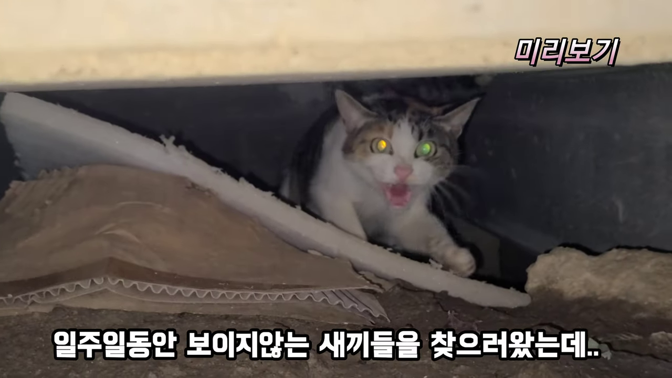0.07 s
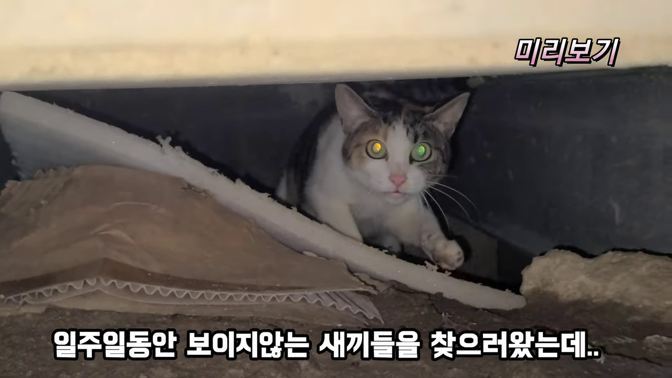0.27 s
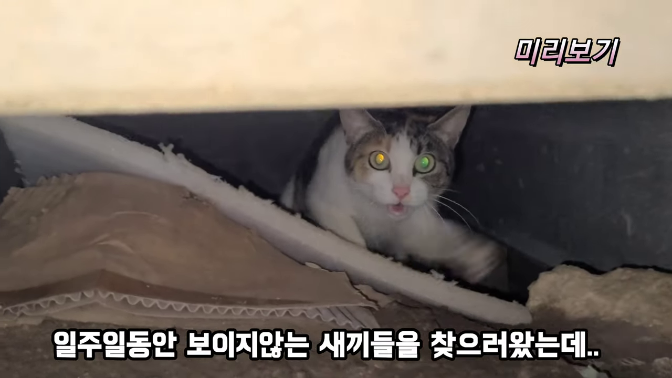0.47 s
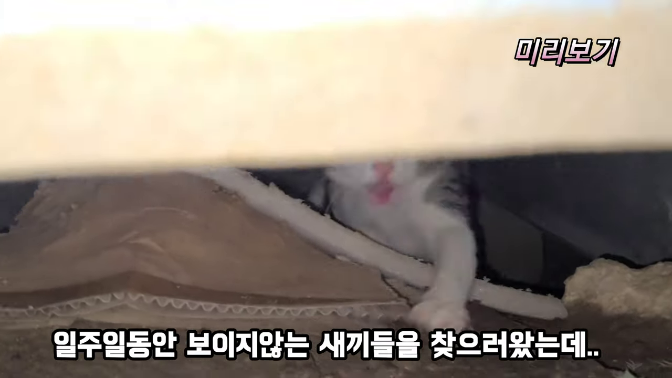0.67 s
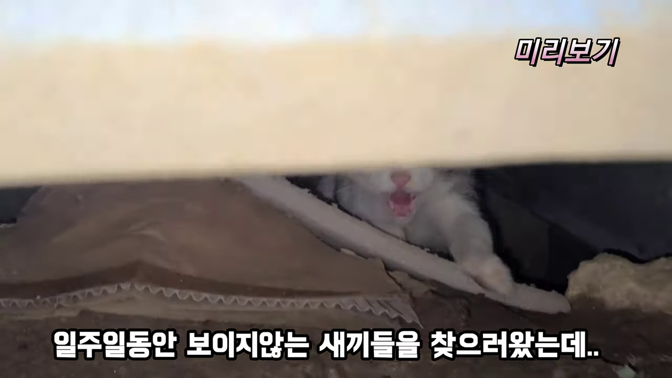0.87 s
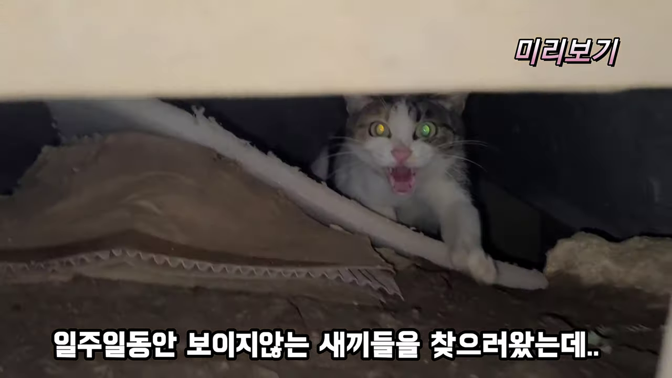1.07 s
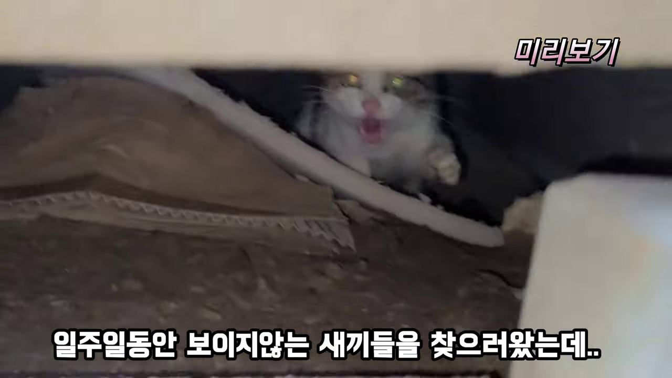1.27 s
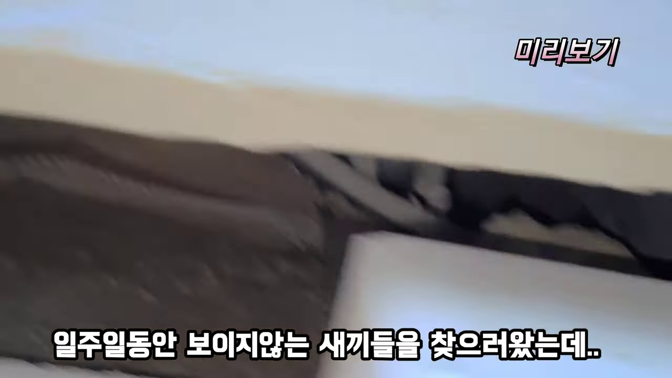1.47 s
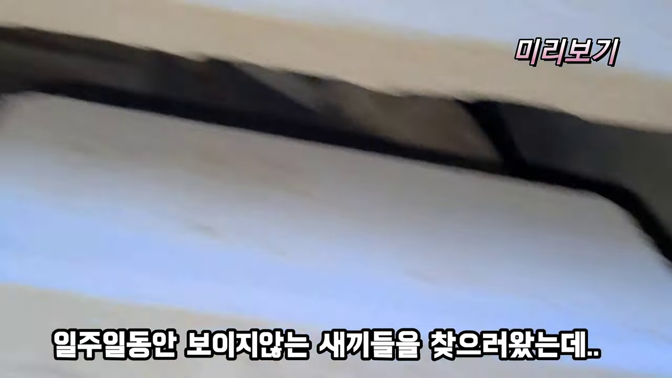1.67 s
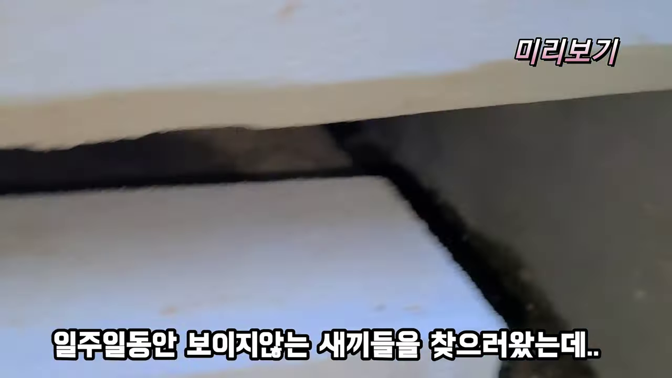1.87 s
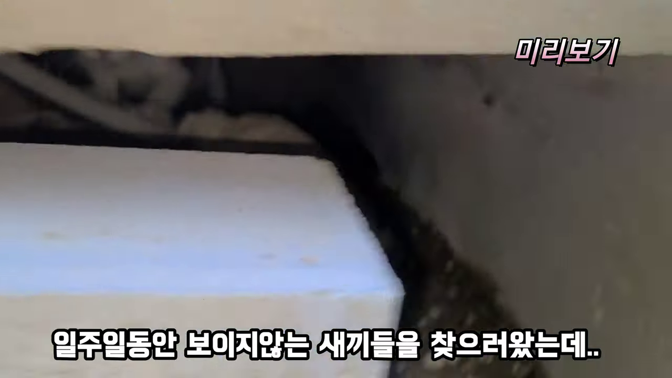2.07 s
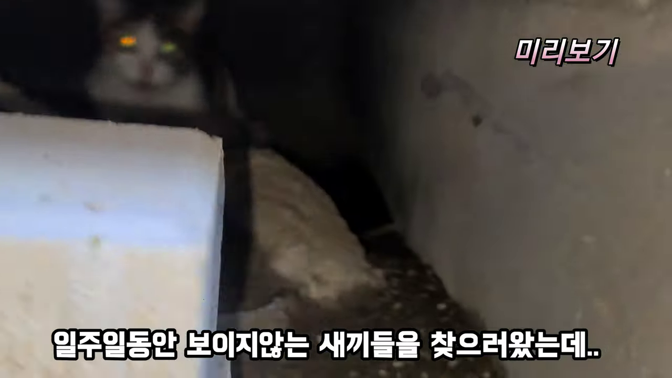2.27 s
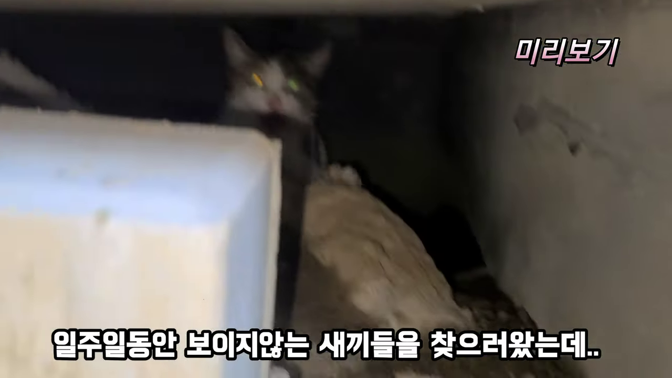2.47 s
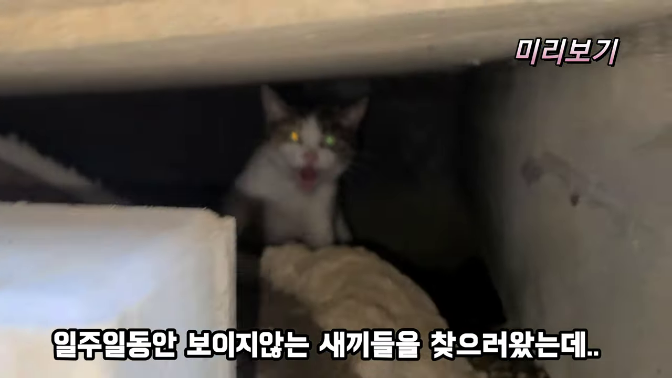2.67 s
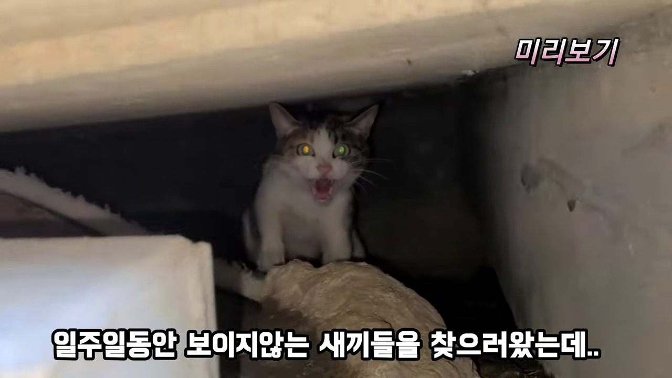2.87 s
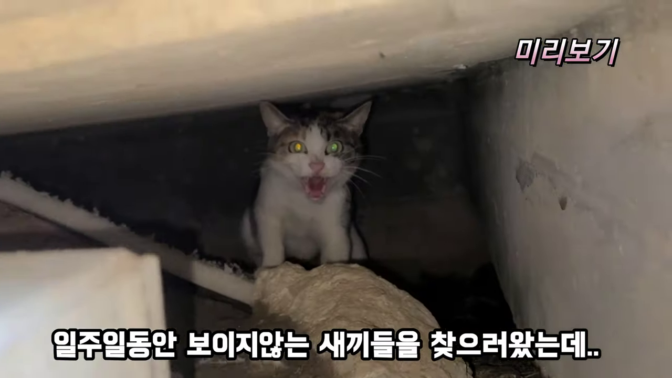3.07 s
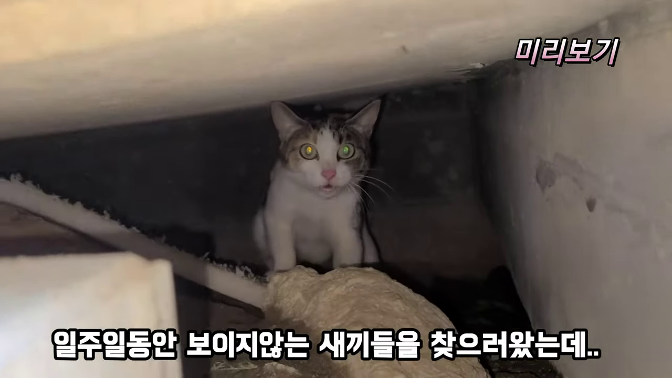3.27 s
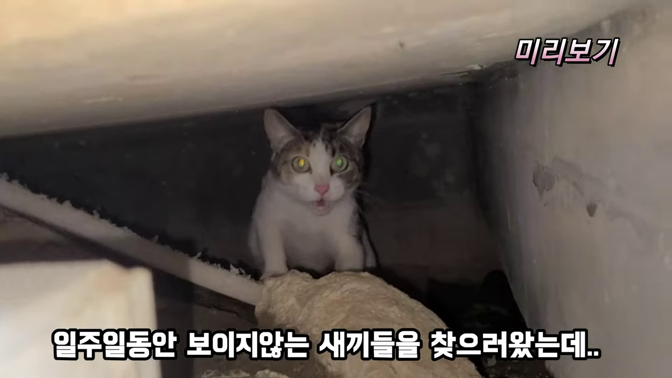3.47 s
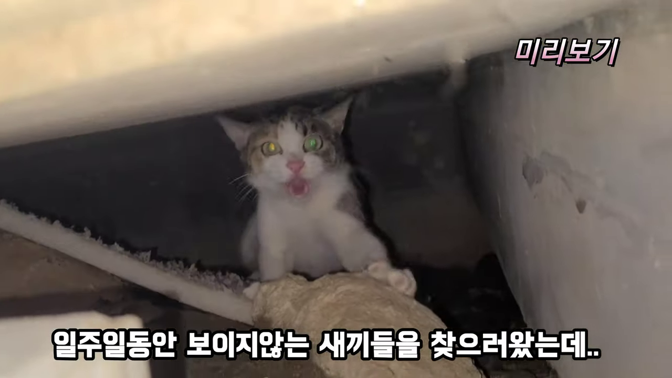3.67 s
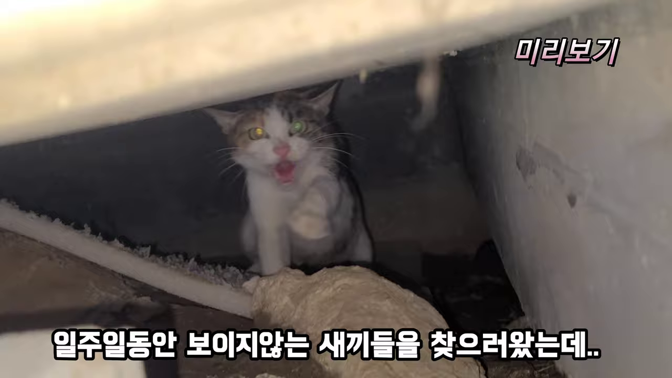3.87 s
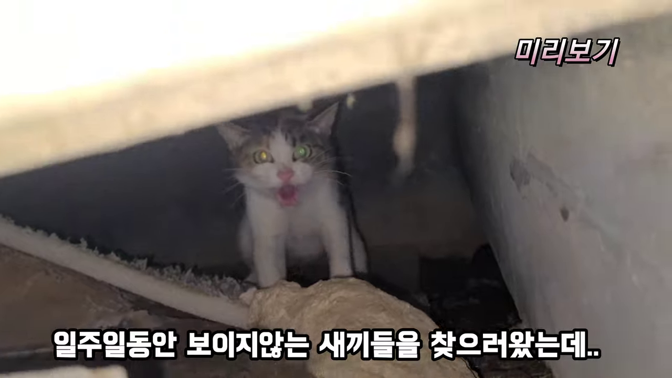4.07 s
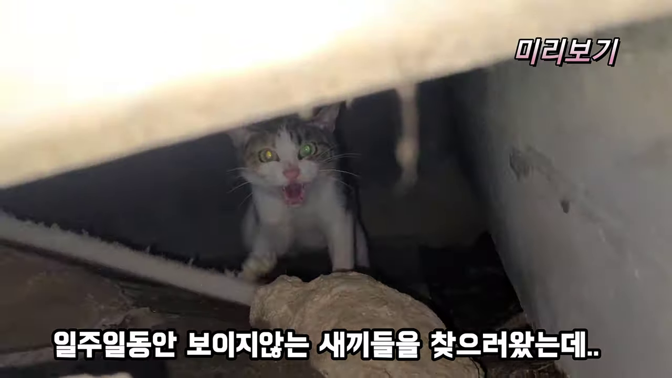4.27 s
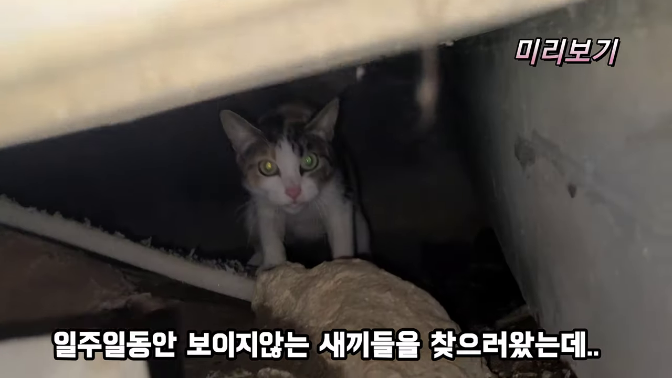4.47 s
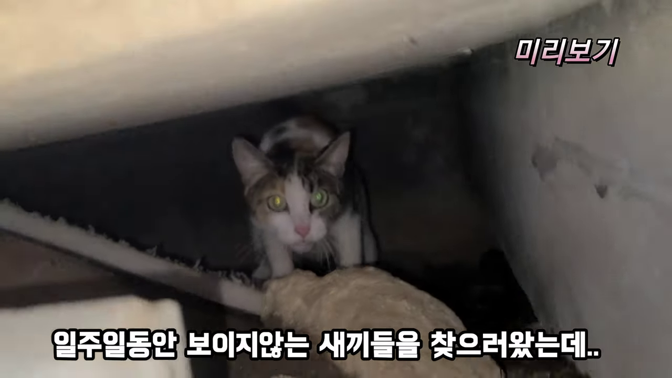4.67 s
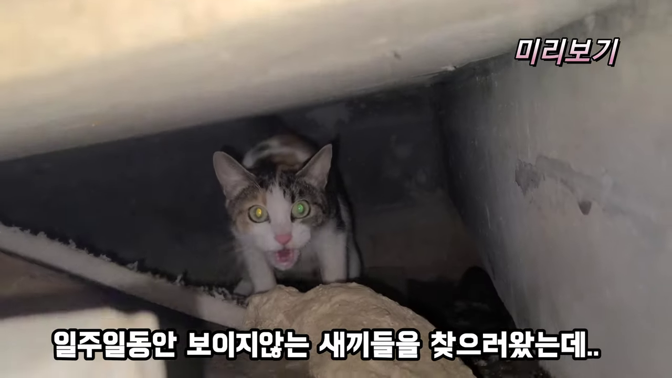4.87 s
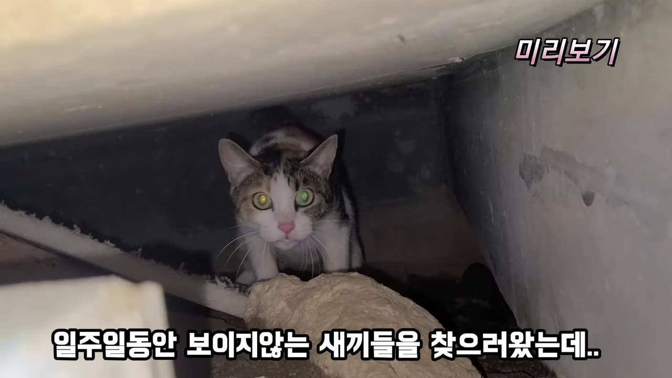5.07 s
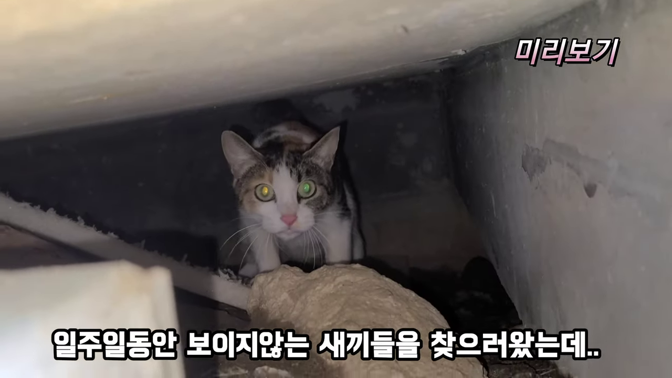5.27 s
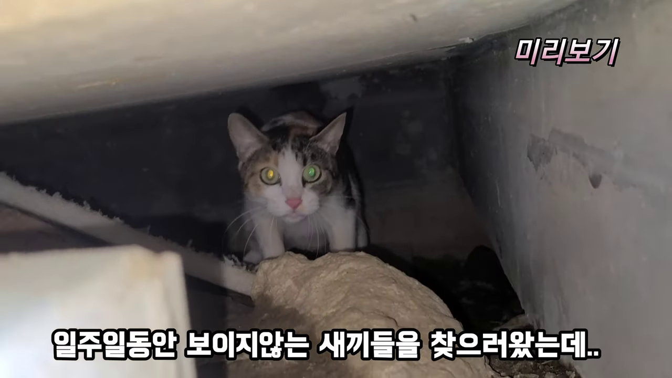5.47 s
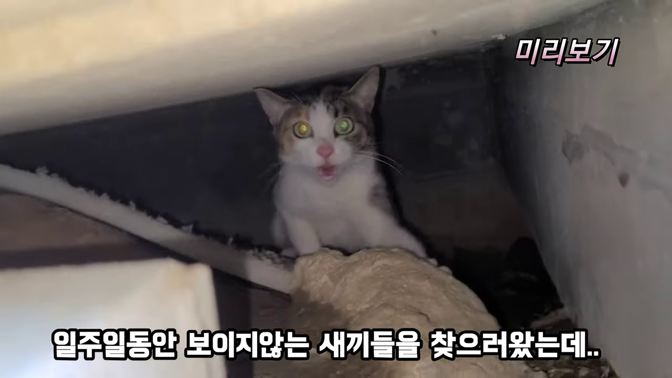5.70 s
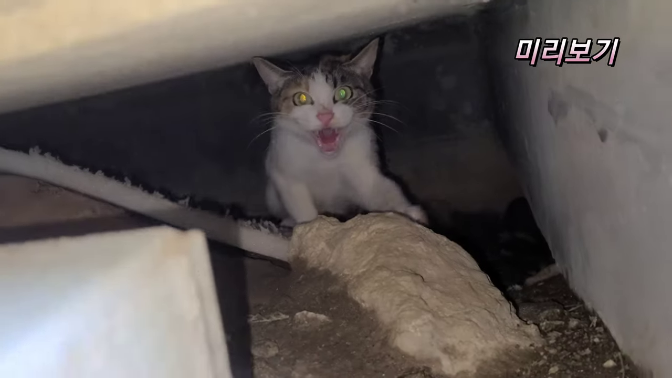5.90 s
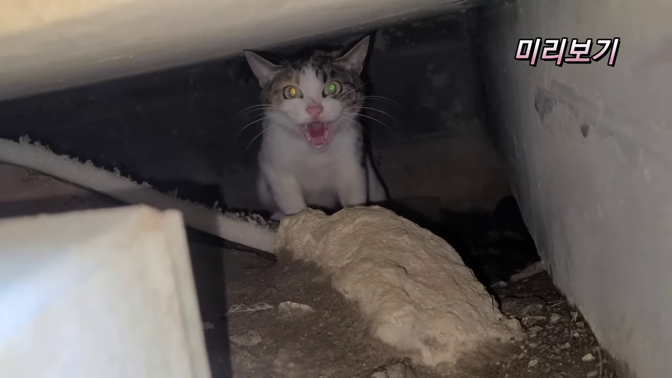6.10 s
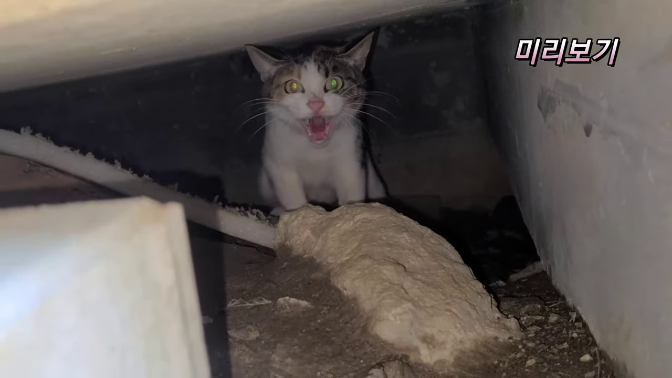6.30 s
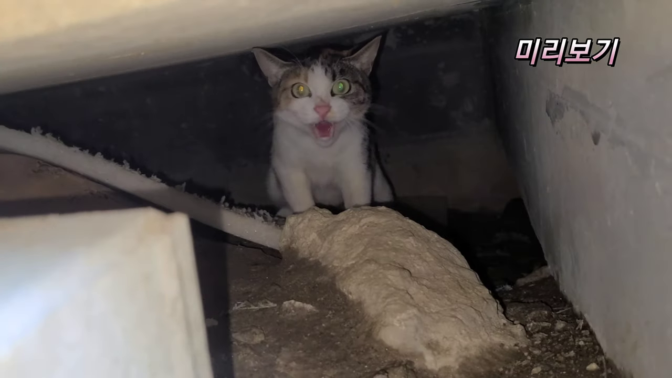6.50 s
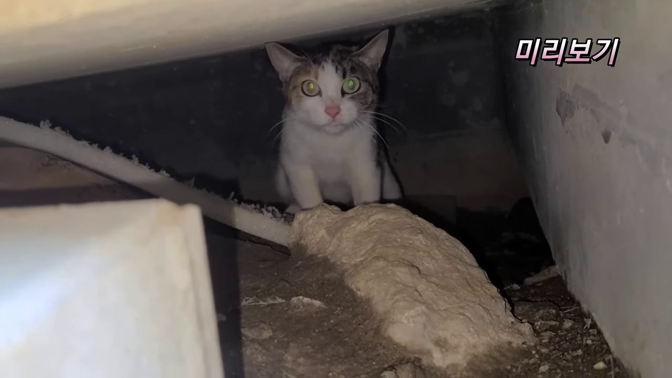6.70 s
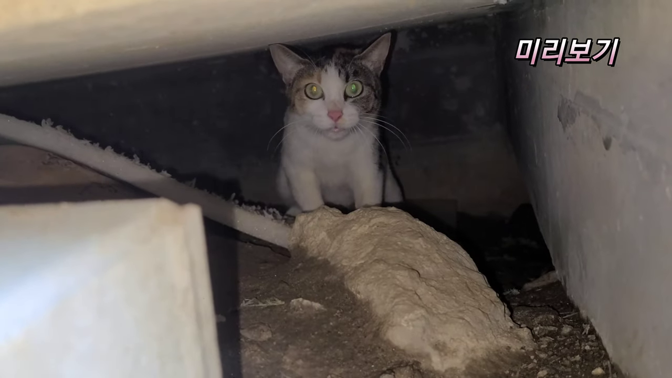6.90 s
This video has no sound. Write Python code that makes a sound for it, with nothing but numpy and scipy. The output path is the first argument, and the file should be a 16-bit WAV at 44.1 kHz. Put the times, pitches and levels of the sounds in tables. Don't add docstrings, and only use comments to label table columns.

```python
import sys
import numpy as np
from scipy import signal
from scipy.fft import rfft, irfft, next_fast_len
from scipy.io import wavfile

SR = 44100
rng = np.random.default_rng(int(sys.argv[2]) if len(sys.argv) > 2 else 0)


def log_audio(samples):
    frames = np.atleast_2d(samples).T
    limited = np.clip(frames, -1, 1)
    pcm = np.round(limited * 32767).astype(np.int16)
    wavfile.write(sys.argv[1], SR, pcm)


def ratio(d):
    e = np.asarray(d, float) / 20
    return 10 ** e


N = 306054
TIME = np.arange(N) / SR


def rms_one(x):
    return x / np.sqrt(np.mean(x ** 2, axis=-1, keepdims=True) + 1e-20)


def in_time(rows):
    s, *columns = np.transpose(rows)
    return [np.interp(TIME, s, column) for column in columns]


def at_hz(points, hz, order=1):
    points = np.array(points)
    return np.interp(np.log(hz + 1), np.log(points[:, 0]), points[:, order])


def coloured(x, points):
    size = next_fast_len(N)
    gain = ratio(at_hz(points, np.fft.rfftfreq(size, 1 / SR)))
    return rms_one(irfft(rfft(x, size) * gain, size)[..., :N])


def drift(rate, channels=2):
    r = np.exp(-40 * np.pi * rate / SR)
    noise = rng.standard_normal((channels, N // 20 + 4002))
    slow = rms_one(signal.lfilter([1], [1, -2 * r, r * r], noise)[:, 4000:])
    return np.array([np.interp(np.arange(N) / 20, np.arange(len(s)), s) for s in slow])


def resonate(x, modes):
    out = 0
    for k, (hz, width, db) in enumerate(modes):
        r = np.exp(-np.pi * width / SR)
        poles = [1, -2 * r * np.cos(2 * np.pi * hz / SR), r * r]
        gain = (-1) ** k * ratio(db) * (1 - r * r) / 2
        out = out + gain * signal.lfilter([1, 0, -1], poles, x)
    return out


def panned(pair, pan_db, alike):
    alike = np.clip(alike, 0, 1)
    left, right = ratio(pan_db / 2), ratio(-pan_db / 2)
    mean = np.sqrt(left ** 2 + right ** 2 + 2 * alike * left * right) / 2
    blend = alike * pair[1] + np.sqrt(1 - alike ** 2) * pair[0]
    return np.array([left * blend, right * pair[1]]) / mean


def grains(per_s, spread_db):
    sizes = ratio(spread_db * np.minimum(rng.exponential(1, N), 4)) * (rng.random(N) < per_s / SR)
    fading = signal.lfilter([1], [1, -np.exp(-1 / (0.0032 * SR))], sizes)
    return rng.standard_normal((2, N)) * (1 + fading)


def rubbing(level_db, pan_db, colour, per_s, spread_db, patchy_db, alike):
    clumps = ratio(patchy_db * (drift(49.0, channels=1) + 0.56 * drift(130)))
    friction = rms_one(clumps * coloured(grains(per_s, spread_db), colour))
    return ratio(level_db) * panned(friction, pan_db, alike)


def strokes(rows, rise_s, fall_s, ease=0):
    s, length = np.transpose(rows)[:2, :, None]
    t = TIME[::32] - s
    before = np.maximum(-t, 0) / (rise_s + ease * length)
    after = np.maximum(t - length, 0) / (fall_s + ease * length)
    return ratio(-20 * (before + after))


def stroke_level(shape, db, rest_db):
    power = (shape * ratio(db)[:, None]) ** 2
    total = power.sum(axis=0) + ratio(rest_db) ** 2
    return np.interp(TIME, TIME[::32], 10 * np.log10(total))


def stroke_side(shape, db, rest_db, pan_db):
    power = (shape * ratio(db)[:, None]) ** 2
    total = power.sum(axis=0) + ratio(rest_db) ** 2
    return np.interp(TIME, TIME[::32], pan_db @ power / total)


def contacts(table, t60, rise, sharpness, overtone_db, snap, skirt=0.99, order=1):
    out, t = np.zeros((2, N + 4000)), np.arange(4000) / SR
    decay = ratio(-60 * np.maximum(t - rise, 0) / t60)
    fade = np.minimum(t / rise, 1) * np.linspace(1, 0, 4000) ** .5 * decay
    bright = signal.butter(1, [2500, 10000], "band", fs=SR)
    noises = rng.standard_normal((len(table), 2, 4000))
    for (s, db, hz, crack_db, pan_db), noise in zip(table, noises):
        force = noise * fade + snap * (t == 0)
        ring = (hz, hz / sharpness, 0)
        overtone = (3600, 2000 / sharpness, overtone_db)
        thud = (0.49 * hz, 0.16 * hz, overtone_db + 1.0)
        body = 0
        for mode in (ring, overtone, thud):
            dull = signal.butter(2, skirt * mode[0], fs=SR)
            body = body + signal.lfilter(*dull, resonate(force, [mode]))
        for _ in range(order - 1):
            body = resonate(body, [(hz, hz / 2, 0)])
        crack = ratio(crack_db - 8.5) * signal.lfilter(*bright, force * fade)
        at = round(s * SR)
        hit = ratio(db) * body / np.abs(body).max() + crack
        out[:, at:at + 4000] += panned(hit, pan_db, alike=0.035)
    return out[:, :N]


def breaths(rows, opens_s, arch_db):
    s, length, db, closing = np.transpose(rows)[:4, :, None]
    t = np.clip(TIME - s, 0, length)
    mouth = np.minimum(t / opens_s, 1) ** 0.73 * np.minimum((length - t) / closing, 1) ** 1.4
    return ratio(db - arch_db * (2 * t / length - 1) ** 2) * mouth


def hisses():
    # (start t/s, length t/s, throat air level/dB, closing t/s, broad air of a wide mouth level/dB)
    hiss_rows = [
        (-.4, 0.64, -32.5, 0.053, -9.5),
        (1.022, 0.6, -36, 0.11, -10.5),
        (2.633, 0.677, -41, 0.065, 2.5),
        (3.919, 0.593, -35.5, 0.02, -3),
        (5.99, 0.69, -37.5, 0.16, -4),
    ]
    # (f/Hz, width f/Hz, level/dB)
    throat_modes = [(370, 22, 1), (485, 36, -8), (900, 60, -2), (1170, 60, -8), (1460, 80, -15),
                    (2190, 70, -17), (2800, 110, -21), (3730, 60, -19), (5350, 200, -25)]
    # level/dB of the (third, fourth, fifth, sixth, upper) resonances
    mouth_shapes = [(-3, -4, 1, -17, -13.5), (-1, -1, 1.5, -8, -5), (-0.5, -0.5, 0.5, -11, -2),
                    (-2.5, -4, -5, 0.5, -1), (0, -21, -9, -18, -14)]
    flow = breaths(hiss_rows, opens_s=0.17, arch_db=4)
    air = rng.standard_normal((3, 2, N))
    band = signal.butter(4, [330, 1250], "band", fs=SR, output="sos")
    broad = rms_one(signal.sosfilt(band, air[0]))
    groups = [throat_modes[:2], *(throat_modes[k:k + 1] for k in range(2, 6)), throat_modes[6:]]
    rings = [(-1) ** max(k - 1, 0) * resonate(air[1], group) for k, group in enumerate(groups)]
    gains = [flow.sum(axis=0), *(ratio(np.transpose(mouth_shapes)) @ flow)]
    throat = sum(gain * ring for gain, ring in zip(gains, rings)) / np.std(sum(rings))
    wide = ratio(np.array(hiss_rows)[:, 4]) @ flow * broad
    flutter = ratio(1.28 * drift(45, channels=1) + 1.26)
    return flutter * (throat + wide) + jets(air[2])


def jets(air):
    # (start t/s, length t/s, level/dB, closing t/s, resonance widening [times])
    jet_rows = [
        (-.3, 0.57, -50, 0.038, 0.58),
        (1.12, 0.59, -77, .07, 2.7),
        (2.815, 0.49, -32.5, 0.059, 1.16),
        (4.0, 0.42, -76, .035, 1.1),
        (6.051, 0.56, -41.5, 0.057, 1.2),
    ]
    # (f/Hz, width f/Hz, level/dB)
    teeth_modes = [(2030, 160, -1), (3000, 300, 0), (3800, 300, -5), (5150, 500, -1), (7250, 450, 4),
                   (9300, 700, -5), (10500, 500, -3), (12600, 900, -7), (14200, 1000, -5)]
    out = np.zeros((2, N))
    for row, gain in zip(jet_rows, breaths(jet_rows, opens_s=0.064, arch_db=7)):
        on = gain > 0
        blurred = [(hz, width * row[4], db) for hz, width, db in teeth_modes]
        out[:, on] += gain[on] * rms_one(resonate(air[:, on], blurred))
    return out * ratio(0.3 * drift(35, channels=1) - 7.5)


def rubs():
    # (start t/s, length t/s, body level/dB, sheen level/dB, left-right level/dB)
    rub_rows = [(0.0, 0.12, -49.5, -53.5, -4), (0.317, 1, -70.5, -58, 44), (0.655, 0.19, -54, -46, 4.5),
                (0.983, 0.0082, -54, -53, 7), (1.174, 0.021, -41, -47.5, 12), (1.238, 0.056, -49, -48, 10),
                (1.354, 0.14, -43, -46, 8), (1.51, 0.26, -48, -49.5, -5), (1.8, 0.07, -47, -43, -6),
                (1.901, .02, -45.5, -49.5, -7), (1.954, 0.034, -68, -56.5, -6),
                (2.03, 0.53, -52, -53.5, -8.5), (2.867, 0.31, -43.5, -46.5, -15),
                (3.508, 0.042, -60, -54, -15), (3.63, 0.012, -49.5, -48.5, -6),
                (3.736, 0.043, -41.5, -42.5, -10), (3.832, 0.043, -48.5, -53, 1),
                (4.08, 0.35, -47.5, -51.5, -10), (4.883, 0.14, -54.5, -57.5, 7),
                (5.423, 0.11, -47, -42.5, 5), (5.555, 0.13, -45.5, -50, 5.5),
                (5.761, 0.022, -30.5, -45, -2), (5.807, 0.066, -39.5, -49.5, 12),
                (5.94, 0.13, -53, -59.5, 13), (6.117, 0.25, -45, -50, 21), (6.428, 0.12, -53, -66, 25),
                (6.926, 0.023, -44, -59, 32)]
    # (f/Hz, level per Hz/dB)
    body_colour = [(760, 8), (1300, 11.5), (1620, 4), (3320, 5.5), (5000, 5), (7000, -22), (15400, -82)]
    # (f/Hz, level per Hz/dB)
    sheen_colour = [(3820, -2.5), (6500, -5.5), (6900, -12.5), (9230, 0), (15100, -14.5), (16000, -8)]
    rest_db = -64.5
    shape = strokes(rub_rows, rise_s=0.064, fall_s=0.018, ease=0.43)
    body_db, sheen_db, pan_db = np.transpose(rub_rows)[2:]
    side = stroke_side(shape, body_db, rest_db, pan_db)
    body_level = stroke_level(shape, body_db, rest_db) - 9.0
    sheen_level = stroke_level(shape, sheen_db, rest_db - 18) - 9.5
    body = rubbing(body_level, side, body_colour, per_s=98, spread_db=-2.5, patchy_db=1.1, alike=.1)
    sheen = rubbing(sheen_level, side - 6, sheen_colour, per_s=14, spread_db=1.0, patchy_db=0.9, alike=.1)
    return focused(body) + sheen


def focused(x, size=256):
    # (t/s, f/Hz)
    pitch = [(.1, 3400), (.65, 2550), (1.18, 3180), (1.27, 2920), (1.38, 3720), (1.53, 2840), (1.8, 2220),
             (4.6, 2250), (4.98, 2560), (5.4, 3070), (5.62, 3400), (5.66, 2410), (5.72, 2200), (5.86, 2600),
             (5.95, 3250), (6.4, 3400)]
    width_hz, sing_db = 700, 7
    out, state = x.copy(), np.zeros((2, 2))
    r, (hz,) = np.exp(-np.pi * width_hz / SR), in_time(pitch)
    for i in range(0, N, size):
        poles = [1, -2 * r * np.cos(2 * np.pi * hz[i] / SR), r * r]
        peak, state = signal.lfilter([1, 0, -1], poles, x[:, i:i + size], zi=state)
        out[:, i:i + size] += ratio(sing_db) * (1 - r * r) / 2 * peak
    return out


def hand_rumble():
    # (t/s, level/dB)
    grip = [(0.0, -43), (1.33, -45.5), (1.48, -34.5), (2.76, -32.5), (3.08, -26.5), (3.38, -33.5),
            (3.65, -26), (3.99, -32.5), (4.08, -34.5), (4.68, -37), (4.84, -36.5), (5.07, -44.5),
            (5.5, -41), (5.72, -27.5), (5.93, -34.5), (6.28, -27), (6.45, -35.5), (6.93, -34.5)]
    # (f/Hz, level per Hz/dB)
    rumble_colour = [(15, -7), (32, -10), (49, 5), (162, -10.5), (234, -15), (400, -33.5), (520, -58),
                     (880, -120)]
    level_db, = in_time(grip)
    pan_db = level_db + 44
    lumps = ratio(2.0 * drift(14)) * coloured(rng.standard_normal((2, N)), rumble_colour)
    alike = np.clip(1 - np.abs(pan_db) / 22, .15, .97)
    return ratio(level_db) * panned(rms_one(lumps), pan_db, alike)


def quiet_air():
    # (f/Hz, level per Hz/dB)
    air_colour = [(59, -38), (100, -10.5), (768, -32.5), (1720, -35), (3120, -38), (7610, -57),
                  (9210, -51.5), (16000, -60)]
    noise = coloured(rng.standard_normal((2, N)), air_colour)
    return ratio(-60.0) * panned(noise, 0.67, alike=0.031)


def rasps():
    # (t/s, peak level/dB, ring f/Hz, crack level/dB, left-right level/dB)
    rasp_rows = [(.541, -38.5, 1310, -75, 2), (.56, -38.5, 1460, -75, 0), (.573, -39.5, 1280, -60, 3),
                 (1.372, -32, 3920, -55, 18), (1.394, -33.5, 2910, -60, 13), (1.795, -45, 2100, -58, 0),
                 (1.905, -36.5, 1280, -53, 0), (2.025, -35.5, 900, -65, 7), (2.561, -35.5, 680, -59, -8),
                 (3.477, -45.5, 1500, -65, -11), (3.488, -46, 5140, -60, -16), (3.512, -48, 5060, -40, -14),
                 (3.527, -40, 1000, -65, -3), (3.668, -37, 1220, -43, -10), (3.704, -30, 4840, -37, -15),
                 (3.714, -29, 4670, -25, -17), (3.729, -23, 1160, -49, -7), (3.747, -36, 1180, -32, -22),
                 (4.467, -24.5, 970, -22, -4), (4.475, -30.5, 1430, -31, 2), (2.665, -47, 700, -70, -4),
                 (5.736, -22, 1600, -41, -5), (5.745, -43, 1550, -26, -16), (5.862, -34, 2650, -53, 18),
                 (6.897, -38, 1700, -42, 22), (6.91, -39, 3000, -42, 24), (6.924, -35.5, 1200, -38, 24),
                 (6.215, -35, 3660, -60, 15), (6.74, -42, 1010, -72, 20)]
    return contacts(rasp_rows, t60=.075, rise=.003, sharpness=4.0, overtone_db=-14, snap=0)


def hollow_boom():
    # (start t/s, length t/s, level/dB)
    shifts = [
        (0.574, 0.01, -35),
        (0.785, 0.079, -33),
        (1.468, 0.021, -30),
        (2.51, 0.028, -24),
        (3.495, 0.0084, -32),
        (3.79, 0.031, -20),
        (4.138, 0.32, -35),
        (4.776, 0.13, -33.5),
        (5.64, 0.027, -27.5),
        (5.673, 0.15, -25),
    ]
    boom_hz = 138
    boom = resonate(resonate(rng.standard_normal(N), [(boom_hz, 45, 0)]), [(boom_hz, 90, 0)])
    shape = strokes(shifts, rise_s=.13, fall_s=0.11)
    level_db = stroke_level(shape, np.transpose(shifts)[2], rest_db=-44.5)
    return ratio(level_db - 1.0) * rms_one(boom)


def drags():
    # (start t/s, length t/s, level/dB, left-right level/dB)
    drag_rows = [(0.766, 0.13, -44, -3), (1.492, 0.14, -39, 33.5), (1.712, 0.038, -41, 27),
                 (1.832, 0.023, -35.5, 23), (2.01, 0.057, -43.5, 18), (2.112, 0.3, -50.5, 8),
                 (2.496, 0.017, -22, -5), (3.499, 0.074, -40, 8), (3.722, 0.013, -22.5, -4.5),
                 (3.796, .1, -39, 17), (4.745, 0.18, -37, 0), (5.6, 0.097, -39.5, 54),
                 (5.756, 0.045, -26.5, 43), (5.794, 0.082, -39, 63), (5.957, 0.031, -37, 45),
                 (6.712, 0.041, -42, 35), (6.9, 0.098, -35.5, 49.5)]
    # (f/Hz, level per Hz/dB)
    drag_colour = [(150, -30), (260, 4), (400, 1.5), (800, -10.5), (1300, -16.5), (1900, -30), (3700, -30),
                   (4600, -66.5)]
    # (f/Hz, width f/Hz, level/dB)
    snap_modes = [(950, 250, 7), (1720, 570, -7.5), (3400, 290, 2.5)]
    snaps_per_s, crackle_db = 260, -21
    shape = strokes(drag_rows, rise_s=0.027, fall_s=0.058, ease=0.15)
    db, pan_db = np.transpose(drag_rows)[2:]
    level_db = stroke_level(shape, db, -118)
    side = stroke_side(shape, db, -107, pan_db)
    sizes = ratio(4.5 * np.minimum(rng.exponential(1, N), 1.8))
    snaps = sizes * (rng.random(N) < snaps_per_s / SR) * rng.choice([-1, 1], (2, N))
    ringing = rms_one(resonate(resonate(snaps + 1e-18, snap_modes[1:2]), snap_modes))
    crackle = ratio(level_db + crackle_db) * panned(ringing, side, alike=0.15)
    rolling = rubbing(level_db - 6.0, side, drag_colour, per_s=150, spread_db=4.5, patchy_db=1.5, alike=0.54)
    return crackle + rolling


def paw_knocks():
    # (t/s, peak level/dB, ring f/Hz, crack level/dB, left-right level/dB)
    knock_rows = [
        (0.7778, -17.5, 1210, -17.5, -5),
        (0.97, -29.5, 1200, -28, -3.5),
        (3.499, -41.5, 810, -59, -14),
        (3.612, -29, 1220, -17.5, -28),
    ]
    return contacts(knock_rows, t60=.038, rise=.0005, sharpness=5.0, overtone_db=-10, snap=5.0, skirt=2.0)


def spits():
    # (t/s, throat peak level/dB, hollow thump level/dB, thump f/Hz, teeth level/dB, length t/s)
    spit_rows = [
        (0.825, -6.5, -4, 163, -14.5, 0.025),
        (2.4796, -12.5, -10.5, 167.5, -23, 0.036),
        (3.7785, -6, -11, 153, -17.5, 0.039),
        (5.7594, -4.5, -8.5, 162, -19, 0.023),
    ]
    # (pop start f/Hz, pop level/dB, whistle f/Hz, whistle width f/Hz, whistle level/dB)
    mouth_rows = [(460, -13, 3440, 150, 6.5), (684, -11, 2900, 900, 2), (530, -5.5, 5300, 910, -4),
                  (500, -4.5, 3560, 1100, 6.5)]
    # (f/Hz, width f/Hz, level/dB)
    throat_modes = [(220, 93, -3), (371.7, 30.5, 2), (486, 73, -5), (676, 200, -13.5), (885, 112, -9.5),
                    (1220, 110, -16.5)]
    # (f/Hz, level per Hz/dB)
    teeth_colour = [(760, -39), (1300, -7.5), (2220, -6), (3530, -4), (5540, -8), (7350, -20), (9460, -10),
                    (16000, -27.5)]
    pop_fall_s, pop_fade_s = 0.00696, 0.0066
    puffs, jet, thump = np.zeros((2, N)), np.zeros((2, N)), np.zeros(N)
    teeth = coloured(rng.standard_normal((2, N)), teeth_colour) * ratio(2.0 * drift(120.0, channels=1) - 1.0)
    for spit, mouth, chance in zip(spit_rows, mouth_rows, rng.random((len(spit_rows), 24))):
        s, throat_db, thump_db, thump_hz, teeth_db, length = spit
        pop_hz, pop_db, *whistle = mouth
        t = np.maximum(TIME - s, 0)
        blow = (TIME > s) / (1 + np.exp(np.minimum((t - length) / 0.0067, 40)))

        burst = blow * (.5 + .5 * np.minimum(t / 0.0097, 1)) * np.exp(-t / 0.075)
        leak = ratio(-36.0) * (TIME > s) * np.exp(-t / 0.043)
        rush = teeth * ratio(teeth_db) * (burst + leak)
        jet += rush + resonate(rush + 1e-18, [whistle])

        gaps = 0.001197 + 0.00158 * chance[:12]
        at = ((s + np.cumsum(gaps) - gaps[0]) * SR).astype(int) + 1
        strength = np.append(1.6, 1.0 + 1.6 * chance[13:])
        puffs[:, at] += ratio(throat_db + 25.0) * (blow * np.exp(-t / 0.016))[at] * strength
        breath = blow * np.minimum(t / 0.0025, 1) * np.exp(-t / 0.044)
        puffs += ratio(throat_db + 16.0) * breath * rng.standard_normal((2, N))

        swell = blow * np.minimum(t / (0.61 * length), 1) ** 4.9
        swell += ratio(-18.5) * np.minimum(t / length, 1) * np.exp(-t / 0.039)
        thump += ratio(thump_db) * swell * np.sin(2 * np.pi * thump_hz * t)

        end_hz = 1.23 * thump_hz
        sag = (pop_hz - end_hz) * pop_fall_s * (1 - np.exp(-t / pop_fall_s))
        cycles = end_hz * t + sag
        thump += ratio(pop_db) * np.exp(-t / pop_fade_s) * np.sin(2 * np.pi * cycles)
    return resonate(puffs + 1e-18, throat_modes) + jet + thump


def two_ports(cat):
    # (f/Hz, gain under a full hand level/dB, likeness to the right port [0-1])
    port_rows = [(458, 2, 1), (970, -4, 0.75), (2200, 0, 0.5), (3280, -16, 0.4), (5300, -20, 0),
                 (7300, -24, 0.46), (9300, -19, 0), (14100, -34, 0)]
    # (t/s, cover [1 = full])
    cover_rows = [(0, 0.054), (.8, 0.021), (1.3, 1.1), (2.5, 0.69), (3.0, 1.56), (3.8, 0.46), (4.3, 0.6),
                  (5.76, 0.82), (6.3, 0.85)]
    lag_s = 0.00021
    size = next_fast_len(N)
    hz = np.fft.rfftfreq(size, 1 / SR)
    alike = np.clip(at_hz(port_rows, hz, order=2), 0, 1)
    direct, scattered = rfft(cat, size)
    late = (alike * direct + np.sqrt(1 - alike ** 2) * scattered) * np.exp(-2j * np.pi * hz * lag_s)
    nodes, (cover,) = np.log([row[0] for row in port_rows]), in_time(cover_rows)
    left = 0
    for row, one in zip(port_rows, np.eye(len(nodes))):
        share = np.interp(np.log(hz + 1), nodes, one)
        left = left + ratio(row[1] * cover) * irfft(late * share, size)[:N]
    return np.array([left, cat[0]])


def grit_ticks():
    # (t/s, peak level/dB, ring f/Hz, crack level/dB, left-right level/dB)
    tick_rows = [ (2.9108, -29.5, 5152, -58, -27), (4.4129, -28.5, 3726, -22.5, -2),
                 (4.667, -44.5, 3400, -62, 13), (4.778, -36.5, 3540, -52, 13), (3.578, -46, 3283, -42, 7),
                 (3.585, -46, 2500, -54, 7), (1.582, -40.5, 4000, -55, 10), (2.057, -46, 6264, -45, 10),
                 (3.982, -44, 4320, -34, -16), (5.9823, -33, 2880, -79, 27.5), (6.2817, -32, 3350, -60, 14),
                 (6.4402, -33.5, 3880, -57, 6), (6.4801, -39, 3400, -65, 11), (6.4991, -40, 3348, -65, 10),
                 (6.595, -51, 4000, -65, 8), (6.6178, -52, 2750, -65, 8), (6.6373, -58, 3100, -65, 13),
                 (6.677, -64, 4167, -62, 10), (6.7166, -32.5, 2926, -42, 19), (6.7894, -45, 2630, -67, 20),
                 (6.4402, -33, 1800, -70, 15), (0.94, -37, 3600, -48, 10), (2, -38, 3333, -60, -2),
                 (2.2906, -44, 2808, -60, 5), (2.931, -31, 3000, -44, -15), (5.065, -55, 4500, -68, 2),
                 (5.158, -51, 2600, -68, 0), (1.2, -39, 3056, -60, 8)]
    return contacts(tick_rows, t60=.025, rise=.0005, sharpness=4.0, overtone_db=-16, snap=4.0)


def foam_puffs():
    # (t/s, peak level/dB, ring f/Hz, crack level/dB, left-right level/dB)
    puff_rows = [
        (1.155, -31.5, 2940, -78, 23),
        (1.51, -34, 2660, -83, 9.2),
        (6.1, -29.5, 2660, -78, 34),
    ]
    return contacts(puff_rows, t60=.13, rise=.02, sharpness=2.0, overtone_db=-30, snap=0, order=3)


def hand_bumps():
    # (t/s, peak level/dB, f/Hz)
    bump_rows = [
        (1.502, -14, 92),
        (3.554, 0.5, 133),
        (4.79, -12.5, 68),
        (5.766, -2, 102),
    ]
    out = np.zeros((2, N))
    for s, db, hz in bump_rows:
        cycles = (TIME - s) * hz
        out[0] -= ratio(db) * np.sin(2 * np.pi * cycles) * np.exp(-(cycles / 0.59) ** 2)
    return out


def fingers():
    # (t/s, peak level/dB, ring f/Hz, crack level/dB, left-right level/dB)
    finger_rows = [(1.574, -30, 1010, -55, 25), (1.6, -33.5, 1110, -55, 18), (1.6212, -43, 1600, -63, 6),
                   (1.627, -46, 1280, -58, 17), (1.774, -45, 1400, -58, 13), (1.642, -38, 1050, -55, 9),
                   (1.692, -30, 1220, -55, 24), (1.702, -36, 864, -55, 17), (1.736, -37, 990, -55, 20),
                   (1.746, -39, 1640, -55, 9), (1.82, -37, 1110, -55, 18), (1.848, -32.5, 1470, -55, 19),
                   (1.867, -40, 888, -55, -8), (2.01, -40, 982, -55, 14), (2.035, -46, 904, -55, 5.5),
                   (2.047, -36.5, 1230, -55, 18), (2.072, -46, 1010, -55, 12), (2.092, -46, 964, -57, 10),
                   (2.135, -46, 939, -57, 1), (2.172, -43, 880, -55, -10), (2.291, -45, 1180, -55, 14.5),
                   (2.371, -40.5, 1110, -55, -18), (3.55, -45, 867, -55, 13), (6.716, -26.5, 980, -56, 19),
                   (6.789, -42, 1070, -63, 23), (6.902, -31, 1720, -56, 31)]
    clicks = contacts(finger_rows, t60=.011, rise=.0002, sharpness=1.6, overtone_db=-20, snap=14.0, skirt=2.4)
    return ratio(3) * clicks


def taps():
    # (t/s, level/dB, half width t/s, right share [below 0: a pull on both])
    tap_rows = [
        (6.3513, -3.5, 0.00017, 0.013),
        (4.8853, -22, 0.00056, -1.3),
        (4.3, -17.5, 0.00058, -1.1),
    ]
    out, t = np.zeros((2, N)), np.arange(-100, 100) / SR
    for s, db, width, share in tap_rows:
        at = round(s * SR)
        rattle = 0.11 * np.cos(2 * np.pi * 9300 * t) * np.exp(-np.abs(t) / 0.0003)
        push = np.exp(-(t / width) ** 4) + rattle
        out[:, at - 100:at + 100] += ratio(db) * push * [[np.sign(share)], [share]]
    return out


def tile_shard():
    # (t/s, peak level/dB, ring f/Hz, crack level/dB, left-right level/dB)
    shard_rows = [(4.719, -40.5, 1560, -67, 1), (4.725, -45, 1620, -70, 1), (4.743, -50, 1600, -66, 0.0),
                  (4.752, -55, 1600, -64, 0.0), (4.770, -30.5, 1470, -50, -1.6),
                  (4.796, -33.5, 1370, -54, 0), (4.805, -37, 1110, -66, 0), (4.83, -48, 3700, -70, 0),
                  (4.842, -46, 1490, -70, 0), (4.852, -42, 1500, -70, 0), (4.848, -47, 3750, -70, 0),
                  (4.883, -33, 1120, -49, -1.2), (4.902, -40, 1450, -60, -1), (4.916, -28.5, 1070, -48, 0),
                  (4.926, -36, 2000, -50, 0), (4.94, -42, 1120, -66, 0), (4.717, -35.5, 755, -70, 0),
                  (4.75, -47, 820, -68, 0.12), (4.781, -45, 1150, -62, 0), (4.829, -48, 650, -73, 0),
                  (4.858, -49, 634, -70, 0), (4.874, -42, 1500, -64, 0), (4.917, -40, 4800, -60, 0)]
    return contacts(shard_rows, t60=.045, rise=.0004, sharpness=12.0, overtone_db=-23, snap=10.0, skirt=1.8)


def scene():
    cat = two_ports(hisses() + spits())
    hand = hand_rumble() + hand_bumps() + fingers() + taps()
    scuffs = rubs() + drags() + rasps() + foam_puffs()
    knocks = paw_knocks() + grit_ticks() + tile_shard()
    return cat + hand + scuffs + knocks + hollow_boom() + quiet_air()


def top_cut(x):
    return signal.sosfilt(signal.butter(12, 15830, fs=SR, output="sos"), x)


def record(dry):
    rounded = 1.15 * np.tanh(dry / 1.15)
    low_pass = signal.cheby2(12, 50, 16300, fs=SR, output="sos")
    mix = signal.sosfilt(low_pass, rounded)
    return top_cut(mix)


dry = scene()
out = record(dry)
log_audio(out)
```